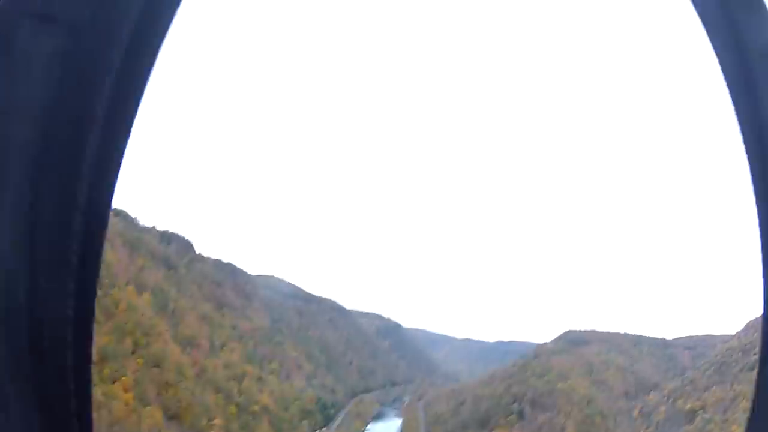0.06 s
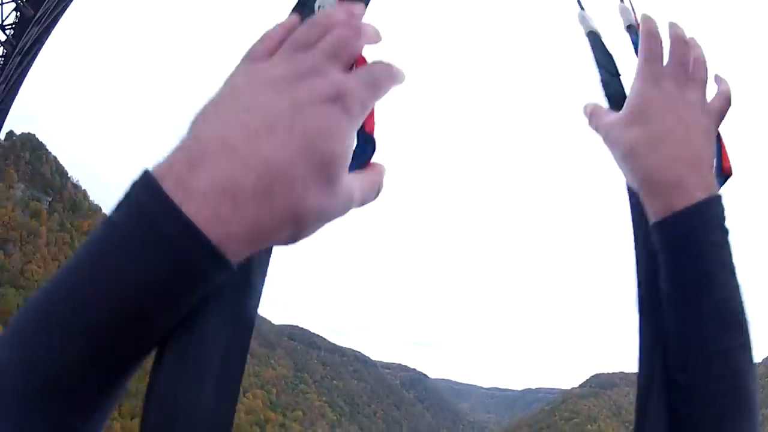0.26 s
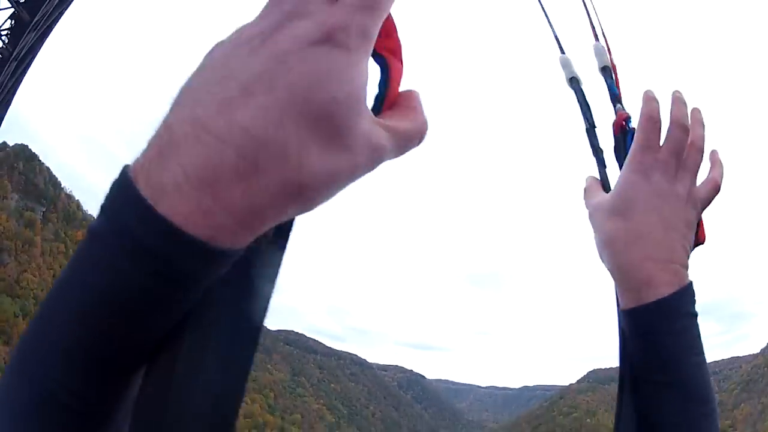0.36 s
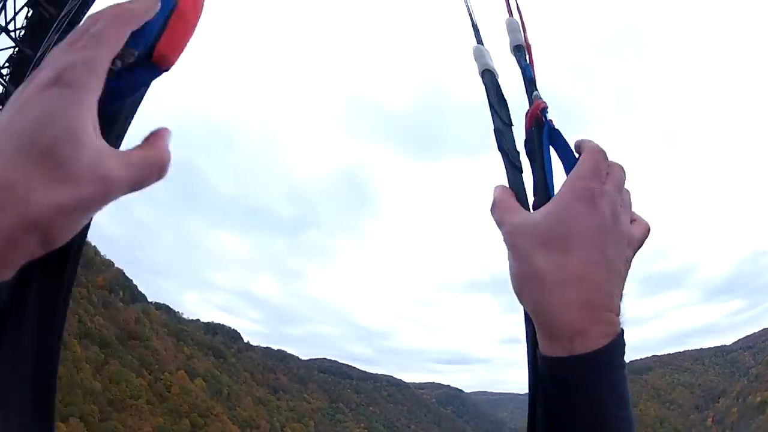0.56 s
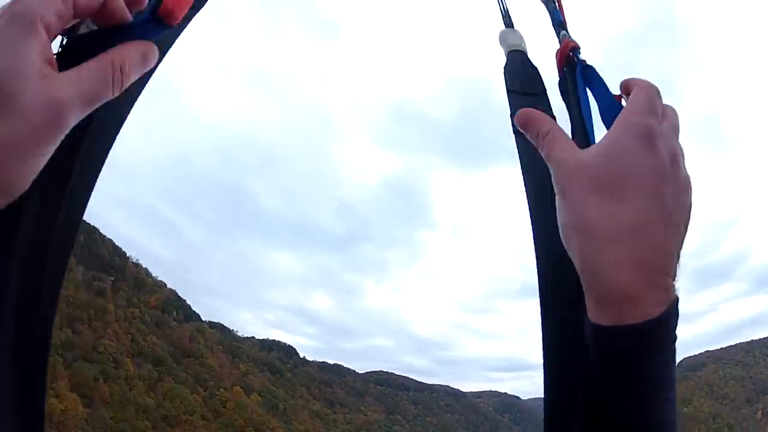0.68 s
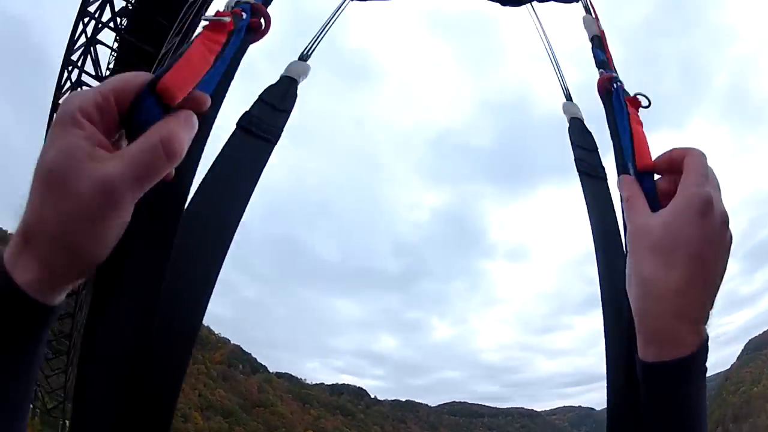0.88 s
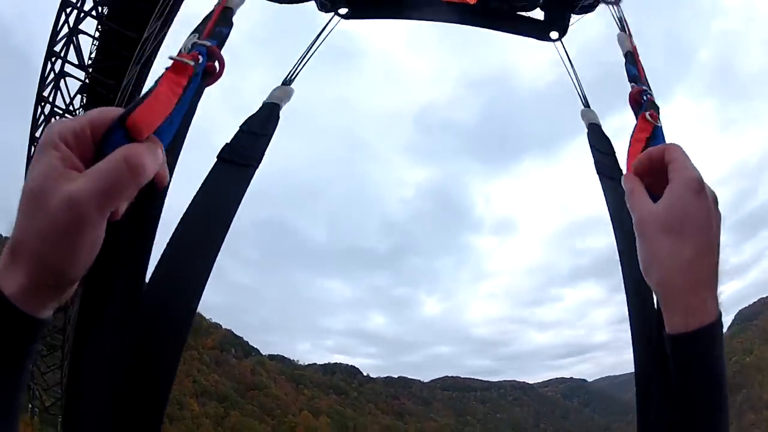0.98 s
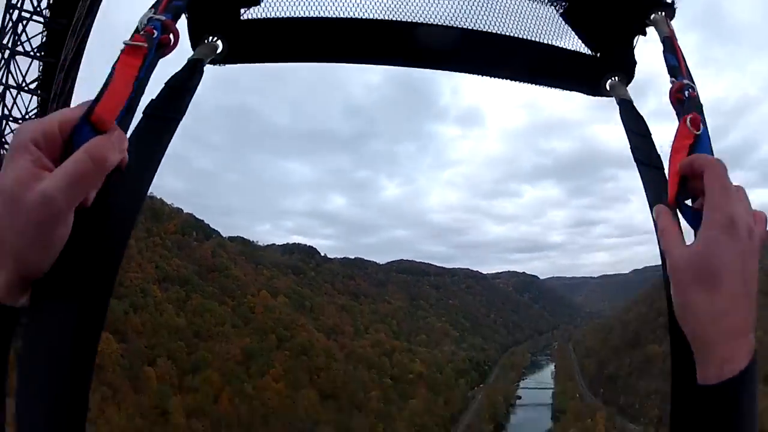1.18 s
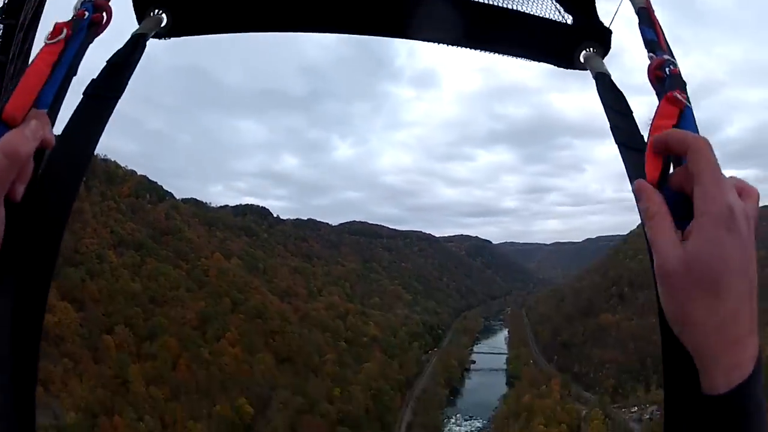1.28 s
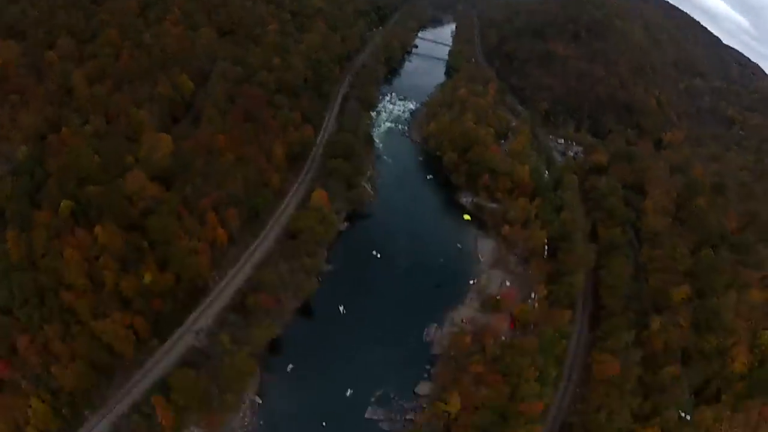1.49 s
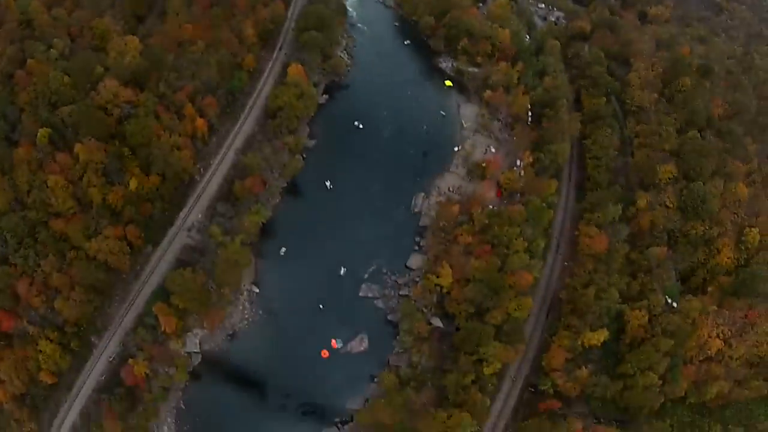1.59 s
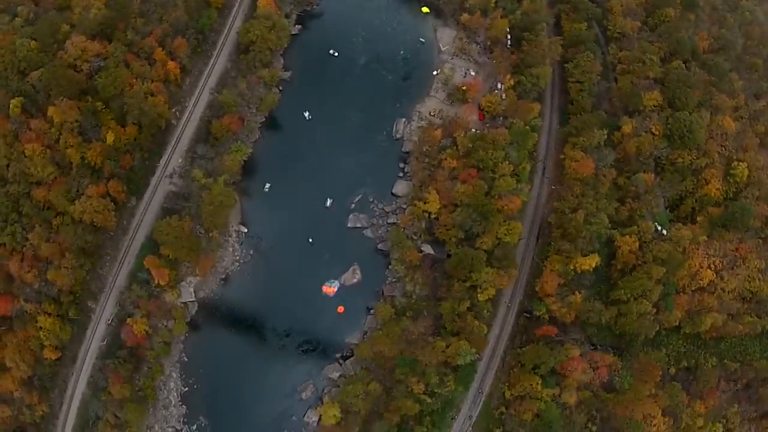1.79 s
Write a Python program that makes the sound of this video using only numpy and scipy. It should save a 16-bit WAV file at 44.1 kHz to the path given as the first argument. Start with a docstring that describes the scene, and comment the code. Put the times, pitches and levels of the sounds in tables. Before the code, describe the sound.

Wind buffets and rushes over a body-worn microphone, swelling from about 0.1 seconds with a low rumble. At 0.4 seconds the parachute fills overhead with one loud slap. Its cloth flutters and flaps until about 1.3 seconds, while small harness fittings tick faintly nearby. The wind eases after one second. Around 1.5 seconds a strap slides and scuffs beside the microphone, leaving a thin hiss of air.

```python
"""Wind buffets and rushes past the microphone of a body-worn camera, aloft under an open parachute.
Eddies rumble right on the port; overhead the canopy fills with one slap of air, and its cloth
flutters and flaps. Close by, small harness fittings knock together and tick. The wind eases;
a strap slides and scuffs next to the camera, leaving a thin hiss of air."""
import sys
import numpy as np
from scipy import signal
from scipy.fft import rfft, irfft
from scipy.io import wavfile
from scipy.ndimage import uniform_filter1d

SR = 44100
rng = np.random.default_rng(int(sys.argv[2]) if len(sys.argv) > 2 else 0)


def persist_wave(psi):
    """Save psi, clipped to +-1, as 16-bit WAV."""
    counts = np.round(np.clip(psi, -1, 1) * 32767).astype(np.int16)
    wavfile.write(sys.argv[1], SR, np.atleast_2d(counts).T)


N = 81585
TIME = np.arange(N) / SR

# spectrum of crackling cloth: (frequency [Hz], relative level [dB])
CLOTH_COLOUR = [(200, 7), (600, -7.5), (950, -5.5), (1300, 4.5), (2000, 3.5), (3000, -2.5), (4400, -9.5),
                (7500, -12.5), (9800, -5), (15000, -9)]


def from_db(db):
    """Decibels to gain."""
    return 10 ** (np.asarray(db) / 20)


def rms_one(x):
    """Scale to unit rms."""
    return x / np.sqrt(np.mean(x ** 2) + 1e-20)


def in_time(rows):
    """Each column of a curve at every sample."""
    times, *columns = np.transpose(rows)
    return [np.interp(TIME, times, column) for column in columns]


def coloured(x, colour):
    """Give a signal a spectrum that falls away beyond its ends; rms 1."""
    hz, db = np.transpose(colour)
    f = np.maximum(np.fft.rfftfreq(N, 1 / SR), 1)
    skirts = np.minimum(f / hz[0], 1) ** 2 * np.minimum(hz[-1] / f, 1) ** 2
    gain = from_db(np.interp(np.log(f), np.log(hz), db))
    return rms_one(irfft(rfft(x) * skirts * gain, N))


def noise(colour):
    """Coloured noise, rms 1."""
    return coloured(rng.standard_normal(N), colour)


def flutter(rate_hz, depth_db):
    """A gain that wanders at random up to about the given rate; rms 1."""
    f = np.fft.rfftfreq(N, 1 / SR)
    drift = rms_one(irfft(rfft(rng.standard_normal(N)) / (1 + (f / rate_hz) ** 4), N))
    return rms_one(from_db(depth_db * np.clip(drift, -2.5, 2.5)))


def eddies(colour, span_s):
    """Low noise whose strength is evened out over the given span; rms 1."""
    x = noise(colour)
    power = uniform_filter1d(np.abs(signal.hilbert(x)) ** 2, max(int(span_s * SR), 1))
    return rms_one(x / np.sqrt(power + 0.14))


def bursts(starts, holds, levels_db, attack_s, decay_s):
    """Summed attack, hold and decay envelopes."""
    envelope = 0
    for start, hold, db in zip(starts, holds, levels_db):
        rise = np.clip((TIME - start) / attack_s + .5, 0, 1)
        fall = np.exp(-np.maximum(TIME - start - hold, 0) / decay_s)
        envelope += from_db(db) * rise * fall
    return envelope


def swells(middles, half_lengths, levels_db):
    """Summed bell-shaped envelopes."""
    return sum(from_db(db) * np.exp(-.7 * ((TIME - middle) / half) ** 2)
               for middle, half, db in zip(middles, half_lengths, levels_db))


def fittings():
    """Close by on the harness, short gritty contacts ring the damped modes of small fittings."""
    # knocks between fittings: (time [s], relative level [dB])
    ticks = [(.085, -30.5), (0.145, -26.5), (0.248, -24.5), (.329, -26.5), (0.375, -22), (.453, -24.5),
             (0.494, -21), (.776, -28.5), (0.86, -26), (.927, -28.5), (1.199, -35), (1.25, -34),
             (1.282, -31), (1.311, -38), (1.326, -31), (1.332, -33.5), (1.651, -34), (1.698, -32.5),
             (1.754, -42)]
    # modes of the fittings: (frequency [Hz], relative level [dB], time to fall 60 dB [s])
    modes = [(3800, -7, 0.004), (4620, -3, 0.0081), (5060, -1, 0.0066), (6890, 0.5, 0.0043),
             (7600, -8, 0.0043)]
    starts, tick_db = np.transpose(ticks)
    envelope = bursts(starts, np.zeros(len(starts)), tick_db - 12.5, attack_s=0.0003, decay_s=0.0023)
    contact = envelope * rng.standard_normal(N) + 1e-18
    ring = 0
    for hz, mode_db, t60 in modes:
        radius, angle = from_db(-60 / (t60 * SR)), 2 * np.pi * hz / SR
        feedback = [1, -2 * radius * np.cos(angle), radius ** 2]
        ring += from_db(mode_db) * signal.lfilter([np.sin(angle)], feedback, contact)
    return ring / 2


def strap():
    """Right beside the microphone, webbing slides with a hiss, rasps over cloth and bumps the camera."""
    # scuffs over cloth: (middle [s], half length [s], rasp level [dB], bump level [dB])
    scuffs = [(1.023, 0.0053, -30.5, -33), (1.07, .0035, -31.5, -44), (1.54, 0.0072, -27, -23.5),
              (1.545, 0.0024, -18, -46), (1.575, 0.007, -24.5, -36.5), (1.698, 0.0063, -54, -29.5)]
    # the slide around the loudest scuff: (time [s], level [dB])
    slide = [(1.42, -94), (1.475, -41.5), (1.54, -34.5), (1.6, -48), (1.68, -62)]
    # spectra of rasp, bump and slide: (frequency [Hz], relative level [dB])
    rasp_colour = [(300, -14), (600, -35), (1000, -19), (2000, 2.5), (3300, 7.5), (4600, -2.5), (6000, 2),
                   (7200, -6), (8500, 0.5), (11000, -16), (13000, -19), (15000, -4.5)]
    bump_colour = [(45, 0), (115, 5.5), (190, -2.5), (300, -16), (620, -23), (900, -51)]
    slide_colour = [(2500, -3), (4000, 2.5), (6000, 2.5), (7500, -1), (11000, -15)]
    middles, halves, rasp_db, bump_db = np.transpose(scuffs)
    slide_db, = in_time(slide)
    rasp = noise(rasp_colour) * flutter(rate_hz=780, depth_db=2.0) * swells(middles, halves, rasp_db)
    bumps = eddies(bump_colour, span_s=0.02) * swells(middles, halves, bump_db)
    return rasp + bumps + from_db(slide_db) * noise(slide_colour)


def rushing_air():
    """Air flutters past the microphone with tiny snaps of creasing cloth, then thins to a hiss."""
    # strength of the rush and of the hiss that follows: (time [s], level [dB])
    airflow = [(0, -48), (.053, -60), (.065, -44), (.11, -41), (.125, -35), (.2, -31), (.32, -28),
               (.47, -32), (.63, -31.5), (.78, -31), (.97, -30.5), (1.07, -36), (1.21, -38), (1.27, -47.5),
               (1.41, -44.5), (1.62, -40.5), (1.85, -48)]
    slipstream = [(1.4, -100), (1.54, -52), (1.63, -40), (1.77, -42.5), (1.85, -49)]
    # spectra of rush and hiss: (frequency [Hz], relative level [dB])
    rush_colour = [(120, 4.5), (300, -0.5), (500, -8), (1100, -6.5), (1300, 1), (2150, -0.5), (2700, -5.5),
                   (3300, -10.5), (3750, -4.5), (4300, -19), (5300, -16.5), (7600, -20.5), (8300, -15),
                   (10000, -11), (14200, -13.5), (15500, -23)]
    hiss_colour = [(300, 2), (950, -28), (1500, -10), (2150, 6), (3000, -6), (4500, -26), (7000, -30),
                   (9800, -7), (14200, -29), (15500, -8)]
    creases_per_s, crease_decay_s, crease_db = 280, 0.00034, -16   # level relative to the rush
    flow_db, = in_time(airflow)
    hiss_db, = in_time(slipstream)
    rush = noise(rush_colour) * flutter(rate_hz=27, depth_db=1.82) * flutter(rate_hz=117, depth_db=1.0)
    snaps = rng.random(N) < creases_per_s / SR
    snap_envelope = signal.lfilter([1], [1, -np.exp(-1 / (crease_decay_s * SR))], snaps + 1e-18)
    creases = coloured(snap_envelope * rng.standard_normal(N), CLOTH_COLOUR)
    hiss = noise(hiss_colour) * flutter(rate_hz=460, depth_db=2.0)
    return from_db(flow_db) * (rush + from_db(crease_db) * creases) + from_db(hiss_db) * hiss


def flapping():
    """Each flap is a rough crackle of taut cloth, ringing briefly at its own pitch, with a puff of air."""
    # flaps in the wind: (time [s], length [s], crackle level [dB], thump level [dB], cloth pitch [Hz])
    flaps = [(0.137, 0.0053, -32, -25.5, 1730), (0.223, 0.015, -37, -23.5, 2220),
             (0.274, 0.028, -27, -20, 2060), (0.39, 0.0018, -16.5, -19, 2980),
             (0.393, 0.024, -23, -18, 2040), (0.579, 0.006, -27, -38, 1620), (0.624, .02, -30.5, -56, 2320),
             (0.692, 0.012, -28.5, -53, 1470), (0.734, 0.021, -29, -24.5, 1660),
             (0.789, 0.022, -29.5, -30, 1530), (0.959, 0.014, -32, -33.5, 2000),
             (1.0396, 0.003, -27.5, -46, 1690), (1.091, 0.0037, -26, -33, 2180),
             (1.101, 0.0035, -34.5, -37, 2280), (1.1447, 0.0032, -26, -34, 2660),
             (1.162, 0.0017, -40, -36, 2200), (1.21, 0.0095, -38.5, -36, 1480),
             (1.302, 0.01, -43.5, -42.5, 2600)]
    # spectrum of the puff's thump: (frequency [Hz], relative level [dB])
    thump_colour = [(20, -33), (60, -1), (180, -4.5), (270, -10), (400, -16), (750, -25), (1500, -30)]
    ring_db = -1.5   # relative to the crackle
    starts, holds, crackle_db, thump_db, pitches = np.transpose(flaps)
    crackle = noise(CLOTH_COLOUR) * flutter(rate_hz=190, depth_db=1.5)
    puffs = bursts(starts, holds, thump_db, attack_s=0.013, decay_s=0.0048)
    thumps = eddies(thump_colour, span_s=0.023) * puffs
    cloth = 0
    for start, hold, db, hz in zip(starts, holds, crackle_db, pitches):
        snap = crackle * bursts([start], [hold], [db], attack_s=0.00069, decay_s=0.004)
        ring = signal.lfilter(*signal.iirpeak(hz, Q=2.96, fs=SR), snap)
        cloth += snap + from_db(ring_db) * ring
    return thumps + cloth


def canopy_slap(time_s=0.3957, width_s=0.0025, peak_db=-4.5):
    """The canopy fills overhead in one pressure wave: a push with a weaker suction on either side."""
    offset_squared = ((TIME - time_s) / width_s) ** 2
    return from_db(peak_db) * (1 - offset_squared) * np.exp(-offset_squared / 2)


def buffeting():
    """Eddies push directly on the microphone port, now and then in a single gust."""
    # wind pressure on the port: (time [s], buffet level [dB], deep rumble level [dB])
    wind = [(0, -34.5, -26), (.09, -36.5, -72), (.15, -20.5, -28.5), (.2, -21, -18), (.34, -21, -30.5),
            (.5, -23.5, -21.5), (.66, -22, -31), (.8, -26.5, -42), (.98, -28, -31), (1.06, -39, -32.5),
            (1.16, -26, -37), (1.27, -51.5, -36.5), (1.39, -35, -48), (1.49, -44.5, -44), (1.58, -37, -31),
            (1.7, -45, -35.5), (1.85, -44, -46)]
    # single gusts: (time [s], length [s], level [dB])
    gusts = [(0, 0.0068, -25), (0.494, 0.0058, -25), (0.526, 0.0405, -23.5), (1.168, 0.013, -26.5)]
    # spectra of buffet and rumble: (frequency [Hz], relative level [dB])
    buffet_colour = [(25, -24), (48, -2.5), (70, 1.5), (102, 6), (135, -7.5), (185, -10), (260, -26.5),
                     (450, -34.5), (900, -45)]
    rumble_colour = [(14, -21), (24, -9), (42, -7), (65, -25), (150, -68)]
    buffet_db, rumble_db = in_time(wind)
    pressure = from_db(buffet_db) + bursts(*np.transpose(gusts), attack_s=0.009, decay_s=0.0064)
    buffet = pressure * eddies(buffet_colour, span_s=0.082)
    rumble = from_db(rumble_db) * eddies(rumble_colour, span_s=0.015)
    return buffet + rumble


def scene():
    """Everything reaches one microphone on the body, the same in both channels."""
    fade_in = np.minimum(TIME / .004, 1)
    mono = (buffeting() + rushing_air() + flapping() + canopy_slap() + strap() + fittings()) * fade_in
    return np.array([mono, mono])


def record(dry):
    """The camera's housing notches the treble; its electronics add a faint whistle and cut the top."""
    # dips from the housing: (frequency [Hz], width [Hz], gain [dB])
    housing_dips = [(5980, 333, -21.5), (11340, 565, -20.5), (12380, 950, -20.5)]
    whistle_hz, whistle_db, cutoff_hz = 12000, -36, 15250
    for hz, width_hz, db in housing_dips:
        width, gain = np.tan(np.pi * width_hz / SR), from_db(db / 2)
        centre = -2 * np.cos(2 * np.pi * hz / SR)
        forward = [1 + width * gain, centre, 1 - width * gain]
        feedback = [1 + width / gain, centre, 1 - width / gain]
        dry = signal.lfilter(forward, feedback, dry)
    # shallow modulation copies the buffeting up into a thin whistle that follows its level
    whistling = dry * (1 + from_db(whistle_db) * np.cos(2 * np.pi * whistle_hz * TIME))
    lowpass = signal.ellip(10, .3, 80, cutoff_hz, fs=SR, output="sos")
    return signal.sosfilt(lowpass, whistling)


dry = scene()
out = record(dry)
persist_wave(out)
```